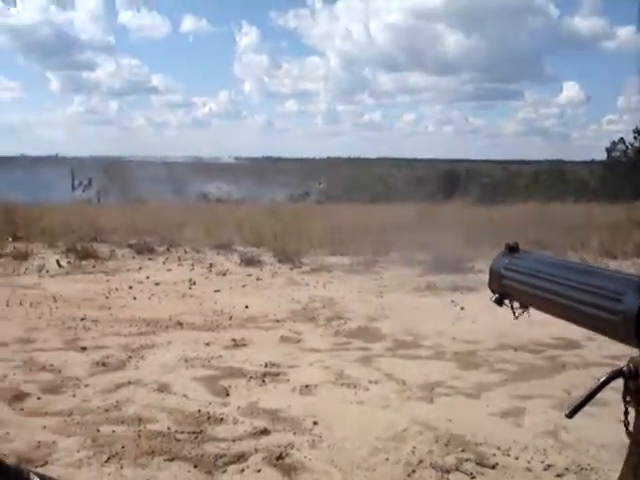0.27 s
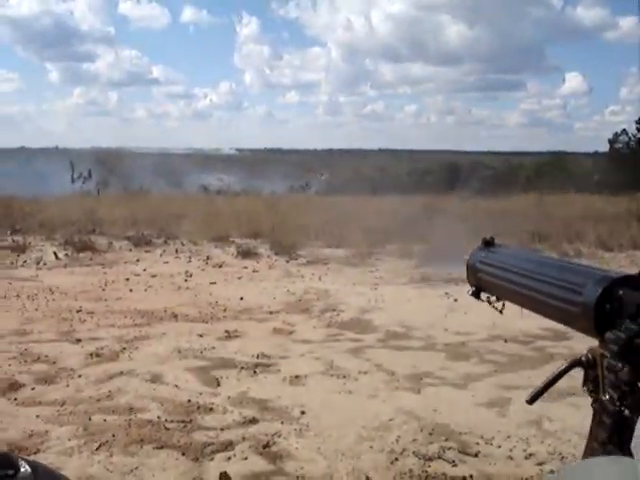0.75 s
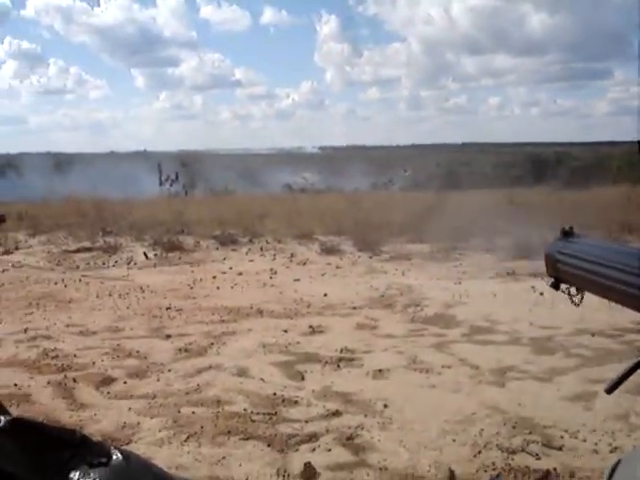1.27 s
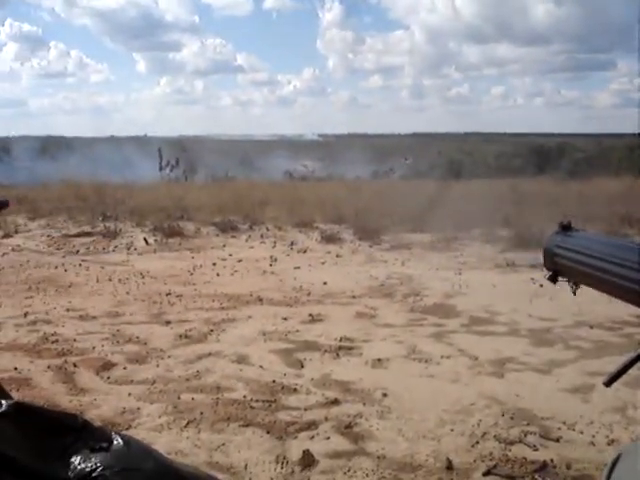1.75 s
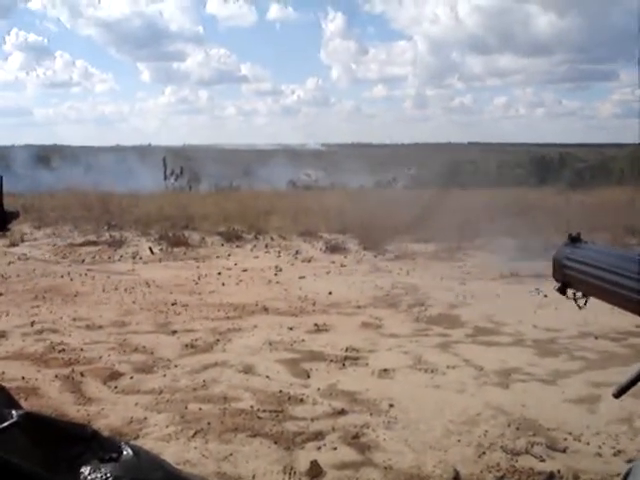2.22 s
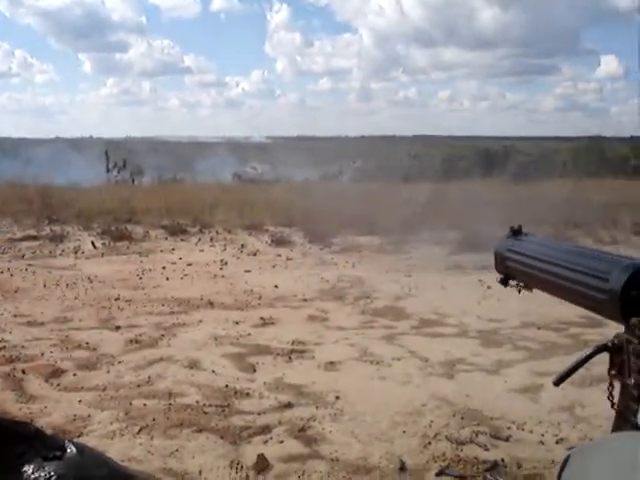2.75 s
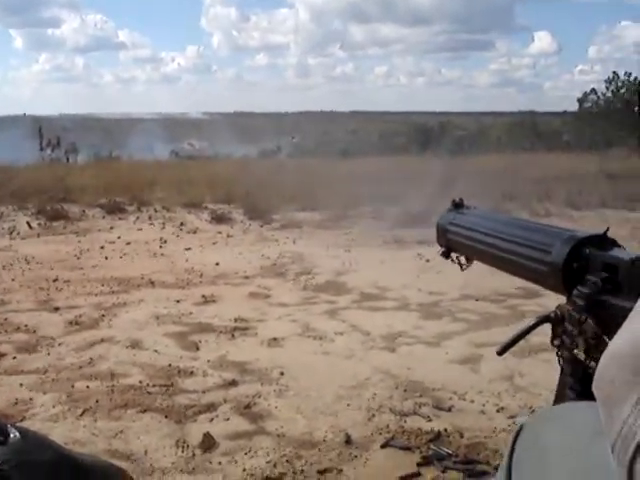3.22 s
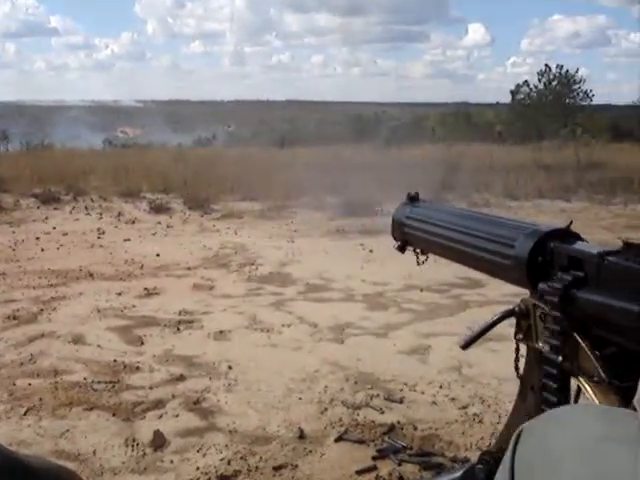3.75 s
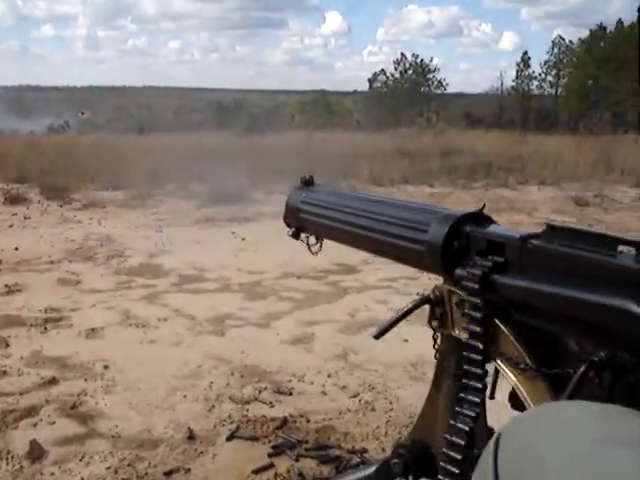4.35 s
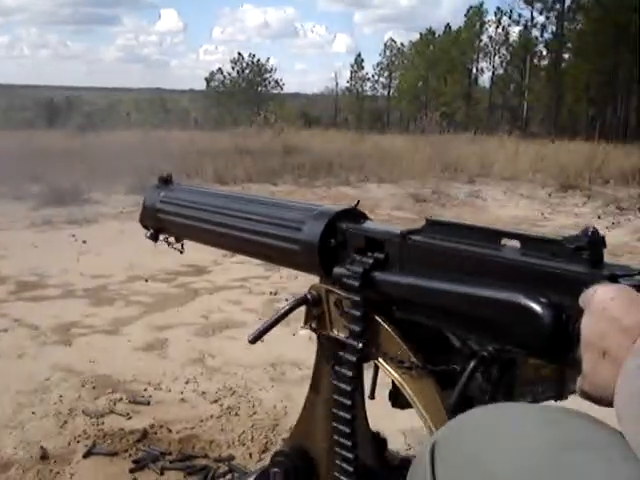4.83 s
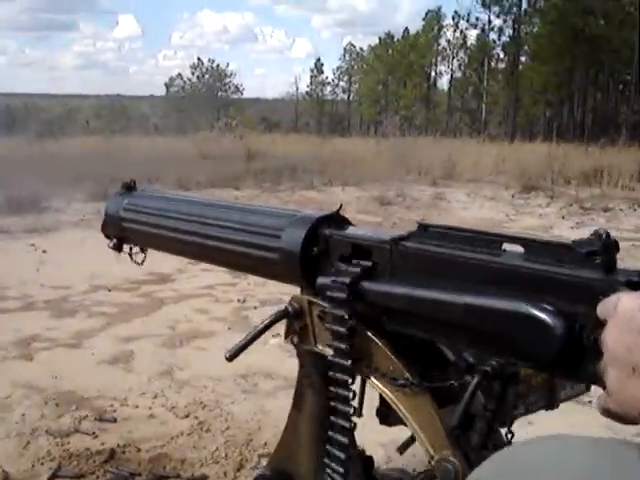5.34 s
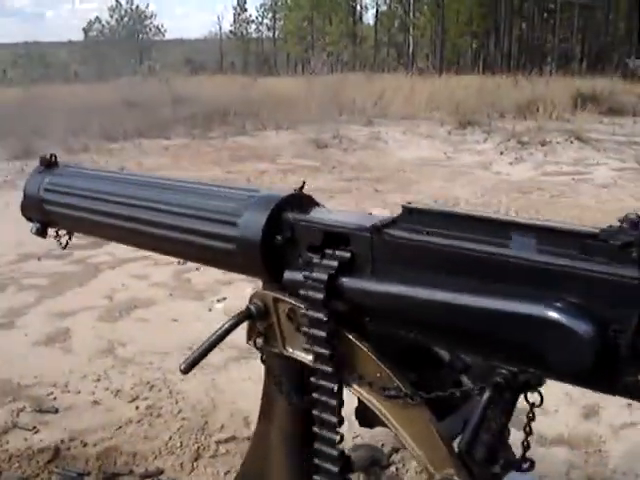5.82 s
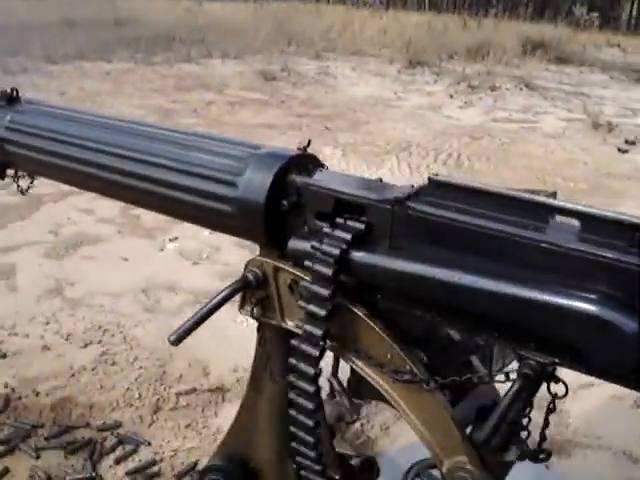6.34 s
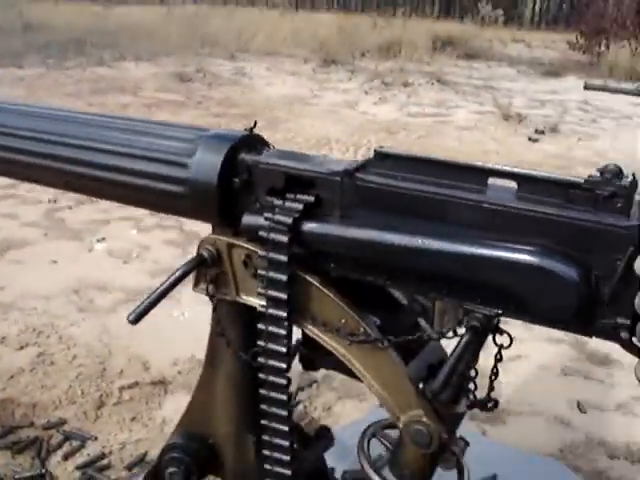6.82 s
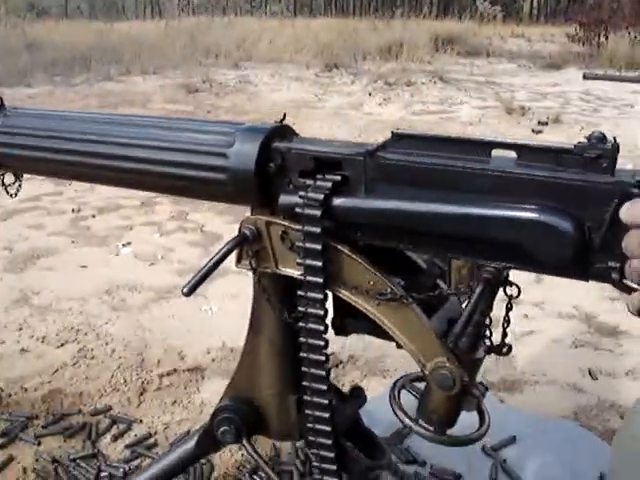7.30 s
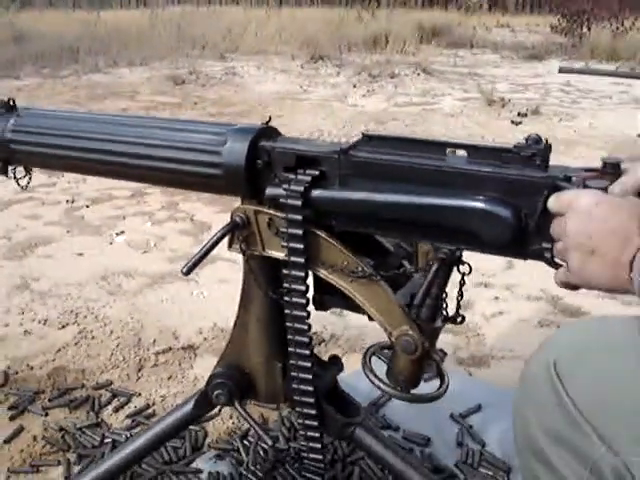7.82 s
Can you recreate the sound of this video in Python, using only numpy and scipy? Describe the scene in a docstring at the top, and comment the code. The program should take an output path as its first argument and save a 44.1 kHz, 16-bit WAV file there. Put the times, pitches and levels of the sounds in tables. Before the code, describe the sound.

A belt-fed machine gun fires one long unbroken string close to the microphone on an open sandy range, about seven shots a second, each a sharp crack, a woody boom and a steel clack with feed rattle. Another gun thumps nearby now and then. Firing stops after six and a half seconds; echo rolls off the trees, brass tinkles, and a faint distant rush swells.

```python
"""An open sandy range: a water-cooled, belt-fed machine gun fires one long string, about seven rounds a second.
Every round is a clack of the lock (steel noise), a crack (bright noise with a sharp front), a boom (dense
reflections shaped by resonances) and the clatter of the feed; the lock grows louder as the listener comes round
to the gun's open side. Another gun thumps further along the line as filtered clicks. Then the echo rolls away
as shaped noise, brass tinkles as decaying sines, and a far rush of noise rises."""
import sys
import numpy as np
from scipy import signal
from scipy.fft import rfft, irfft
from scipy.io import wavfile
from scipy.ndimage import uniform_filter1d

SR = 44100
rng = np.random.default_rng(int(sys.argv[2]) if len(sys.argv) > 2 else 0)


def log_audio(samples):
    """Write samples as a 16-bit WAV file to the path given in sys.argv[1]."""
    # one column per channel
    frames = np.atleast_2d(samples).T
    # limit to full scale, then quantise
    limited = np.clip(frames, -1, 1)
    pcm = np.round(limited * 32767).astype(np.int16)
    wavfile.write(sys.argv[1], SR, pcm)


N = 355886
SIZE = 8192   # samples in one short sound
AGE = np.arange(SIZE) / SR   # seconds since a short sound began
RUSH_S = 0.0236   # length of the blast's first rush

# moments at which the gun fires, a little uneven and quicker towards the end: [t/s]
ROUNDS = [0, .138, .2779, .4084, .5444, .6741, .8071, .9406, 1.078, 1.2162, 1.3571, 1.4995, 1.637, 1.774,
          1.912, 2.0487, 2.1859, 2.327, 2.4591, 2.6005, 2.7359, 2.8762, 3.0151, 3.1621, 3.3, 3.42, 3.5642,
          3.7062, 3.843, 3.9801, 4.1175, 4.2413, 4.3765, 4.5166, 4.653, 4.7895, 4.927, 5.0527, 5.1935,
          5.3193, 5.4515, 5.578, 5.7044, 5.8313, 5.9576, 6.0842, 6.2078, 6.34, 6.4663]
# colour of steel parts knocking and sliding: [f/Hz, relative level per Hz/dB]
STEEL = [(200, -9.5), (600, -3.5), (1100, 4), (2000, 0), (3500, -1), (5000, -5), (7000, -6.5),
         (10000, -17.5)]


def booms(thud_db=-46, thud_hz=62, sway=.008):
    """Nearly the same boom at every round, its colour moving between four tones; recoil thuds through the mount."""
    # resonances of the boom in each of its four tones: [f/Hz, width/Hz, level/dB]
    tone_0 = [(141.6, 41, -15), (182.6, 64, -9), (229.5, 18, -1.5), (262, 29, -0.5), (310.4, 42, -3.9),
              (327, 31.5, 0.2), (359, 51, -6.5), (414.1, 21.3, 1.5), (478, 24, 0.5), (548, 73, -1),
              (617, 15, -8), (654.6, 66, -0.7), (725, 74, -11.5), (748, 125, -4.9), (784, 110, -2),
              (863, 25, -3), (965, 78, -4.5), (1100.6, 58, -0.4), (1206, 50, -8.0), (1251, 35, -3),
              (1349, 128, -7), (1470, 154, -11), (1581, 17, -5.5), (1710, 27, -5.5), (1607, 69, -14),
              (1799, 170, -17.5), (1907, 140, -15.5), (2160, 2100, -20)]
    tone_1 = [(133, 17, -26), (177.6, 98, -12.5), (254, 60, -3.5), (326, 48, -14.5), (367.4, 19, -6),
              (387.7, 43, -4.5), (462, 50, -4.8), (581, 118, -5.5), (629.5, 14, 6), (674, 11.3, 3.5),
              (732, 53, 1.5), (776, 70, -5.5), (894, 69, 0.9), (1030, 94, -9.5), (1144, 49, -2.5),
              (1305, 280, -14.5), (1420, 630, -16), (1624, 26, 0.5), (2050, 280, -12), (2160, 67, -14)]
    tone_2 = [(176, 52, -7), (250, 20, -17.5), (299, 92, -2), (342, 20, -18), (379, 36, 3), (463, 16, 3),
              (558, 55, 4.7), (687, 150, -5), (750, 60, -4.5), (880, 110, -2.5), (1000, 210, -15.5),
              (1000, 180, -9), (1250, 380, -9), (1407, 20, -1.5), (1600, 26, -12.5), (1680, 78, -39),
              (1800, 140, -13.5), (2080, 410, -28.5)]
    tone_3 = [(178, 41, -8.5), (295.4, 93, 3), (405, 74, -4.5), (469, 22, 1), (563, 37, -3.5),
              (594, 170, -2), (716, 68, -2.5), (830, 66, -9), (801, 50, -4.5), (907, 31, 2),
              (930, 16, -21.5), (995, 26, -3), (1110, 93, -8.5), (1116, 110, -5.5), (1290, 78, -4),
              (1503, 43, -5), (1640, 182, -8), (2080, 920, -13.5)]
    # the boom's colour goes back and forth between four tones: [t/s, position among the tones, 0 to 3]
    colour_path = [(3.31, 0), (3.85, 2.37), (4.45, 1.37), (4.85, 2.43), (5.35, 2.5), (5.85, 3)]
    # colour of the roll over the ground: [f/Hz, relative level per Hz/dB]
    roll_spectrum = [(120, -14), (180, -13.5), (250, 4), (330, -7), (500, -7.5), (800, -11), (1100, -22),
                     (2000, -36.5), (2600, -36)]
    boom_db = -13.2   # every round has the same charge

    out = np.zeros(N)
    scatter = rng.standard_normal(SIZE) * fade(0.1025)
    ground = noise(roll_spectrum)
    tones = np.array([boom_response(scatter, ground, tone) for tone in (tone_0, tone_1, tone_2, tone_3)])
    thud = band(signal.unit_impulse(SIZE), thud_hz / 2, thud_hz * 2, order=1)
    thud = rms_one(thud, span=0.0051)
    for s in ROUNDS:
        # crossfade the two tones nearest to the position
        share = np.maximum(1 - np.abs(np.arange(len(tones)) - curve(colour_path, s)), 0)
        boom = rms_one(share @ tones) * tones.std()
        # gun and listener sway, so all paths stretch or shrink a little from round to round
        stretch = 1 + sway * rng.standard_normal()
        boom = np.interp(AGE * stretch, AGE, boom) * flicker(depth_db=.8, step_s=.006)
        add(out, s, from_db(boom_db) * boom + from_db(thud_db) * thud)
    return out


def boom_response(scatter, ground, resonances, rise_s=0.0088, roll_db=-7, roll_t60=0.79, count=6):
    """A rush of dense near reflections, then the ground roll; both take the colour of one tone."""
    roll_s = 0.092   # the roll breaks off at this age
    colour = resonance_curve(resonances)
    rush = np.minimum(AGE / rise_s + 0.12, 1) * from_db(-1500 * np.maximum(AGE - RUSH_S, 0))
    for _ in range(count):   # the reflections settle on the resonances and fill the rush evenly
        phase = np.angle(rfft(scatter))
        scatter = rms_one(irfft(colour * np.exp(1j * phase)))
        power = np.abs(uniform_filter1d(scatter ** 2, size=260))
        scatter = rush * scatter / np.sqrt(power + 0.056)
    ending = from_db(-600 * np.maximum(AGE - roll_s, 0))
    swell = np.minimum(AGE / RUSH_S, 1) ** 2
    decay = from_db(roll_db - 60 * np.maximum(AGE - RUSH_S, 0) / roll_t60)
    roll = ground * swell * decay * ending
    spectrum = rfft(rms_one(scatter, span=RUSH_S) + roll)
    # flatten the broad spectrum, then colour rush and roll together
    broad = np.sqrt(np.abs(uniform_filter1d(np.abs(spectrum) ** 2, size=9)) + 1e-9)
    whole = irfft(spectrum * uniform_filter1d(colour, size=3) / broad)
    whole = whole * np.minimum(AGE / 0.001 + .05, 1) * ending
    return rms_one(whole, span=RUSH_S)   # level of the rush is 1


def resonance_curve(resonances, blur_hz=22):
    """Gain at every frequency for overlapping resonances."""
    bins_hz = np.fft.rfftfreq(SIZE, 1 / SR)
    hz, width, db = np.transpose(resonances)[:, :, None]
    detuning = 2 * (bins_hz - hz) / np.hypot(width, blur_hz)
    peaks = from_db(db) / (1 + detuning ** 2)
    return np.sqrt(np.sum(peaks ** 2, 0))


def cracks(spread_db=.6, dull_db_per_s=40):
    """The bright edge of the blast: partly alike, partly fresh turbulence; its top flickers and dies first."""
    # colour of the crack: [f/Hz, relative level per Hz/dB]
    crack_spectrum = [(1200, -28.5), (1900, 3), (2300, 1), (3500, 2.5), (4500, -0.5), (6000, -6.5),
                      (8000, -10), (10000, -14.5)]
    crack_db = -15.4
    alike = .3   # share of the power that every round has in common
    out, same, life = np.zeros(N), noise(crack_spectrum), crack_life()
    lowpass = signal.butter(2, 5000, fs=SR, output="sos")
    for s in ROUNDS:
        crack = np.sqrt(alike) * same + np.sqrt(1 - alike) * noise(crack_spectrum)
        dull = signal.sosfiltfilt(lowpass, crack)
        top = (crack - dull) * from_db(-dull_db_per_s * AGE) * flicker(depth_db=2, step_s=.008)
        body = dull * flicker(depth_db=0.5, step_s=0.0016)
        gain = from_db(crack_db + spread_db * rng.standard_normal())
        add(out, s, gain * life * (body + top))
    return out


def crack_life(front_db=3, front_s=.0007, sag_db_per_s=380, cut_db_per_s=2200,
               scatter_db=-18.5, scatter_rise_s=.035, scatter_hold_s=.02, scatter_db_per_s=560):
    """A sharp front sags through the first rush and breaks off; weaker scatter from the ground follows."""
    front = front_db * np.exp(-AGE / front_s)
    direct_db = front - sag_db_per_s * AGE - cut_db_per_s * np.maximum(AGE - RUSH_S, 0)
    scatter = from_db(scatter_db) * envelope(AGE, scatter_rise_s, scatter_hold_s, scatter_db_per_s)
    return np.hypot(from_db(direct_db), scatter)


def action(spread_db=.9, slide_db=-10, slack_s=.003, rattle_t60=0.057):
    """The lock slides home and closes just before each round; belt and feed rattle after it."""
    # lock opens, belt is pulled, case drops: [mean delay after the round/s, mean level/dB]
    feed = [(.035, -25.5), (.045, -24.5), (.059, -43), (.088, -42)]
    # the action comes to rest: [t/s, level/dB]
    last_clacks = [(6.559, -44), (6.577, -31), (6.672, -37)]
    slide_s = 0.0075      # the lock slides this long before it closes
    lock_lead_s = .0083   # the lock closes this long before the round fires
    # the lock grows louder as the listener comes round to the open side
    approach_s, lock_levels_db = [3.3, 6.1], [-22.0, -16.5]

    out = np.zeros(N)
    slide = np.minimum(AGE / slide_s, 1) ** 2 * from_db(-3000 * np.maximum(AGE - slide_s, 0))
    rattle = np.minimum(AGE / .003, 1) * fade(rattle_t60)
    for s in ROUNDS:
        lock_db = np.interp(s, approach_s, lock_levels_db) + spread_db * rng.standard_normal()
        closes = s - lock_lead_s
        add(out, closes - slide_s, from_db(lock_db + slide_db) * noise(STEEL) * slide)
        add(out, closes, from_db(lock_db) * clack(ring_db=-1, t60=0.048))
        chances = rng.standard_normal((len(feed), 2))
        for (delay, feed_db), (slip, force) in zip(feed, chances):
            clatter = noise(STEEL) * rattle * flicker(depth_db=3.0, step_s=0.0037)
            add(out, s + delay + slack_s * slip, from_db(feed_db + 3.3 * force) * clatter)
    for s, db in last_clacks:
        add(out, s, from_db(db) * clack(ring_db=-1, t60=0.21))
    return out


def clack(ring_db, t60):
    """Steel meets steel: a brief contact, and a dense ring that differs from blow to blow."""
    contact, attack = fade(.02), np.minimum(AGE / .0003, 1)
    return noise(STEEL) * (contact + from_db(ring_db) * fade(t60)) * attack


def other_guns(low_hz=170, high_hz=400, edge_db=-14):
    """Heard from afar, a shot is one rounded pressure swing with a little edge, or a dull pop."""
    # the gun further along the line: [t/s, peak level of the swing/dB]
    other_gun = [(0.11, -7.5), (1.134, -8.5), (1.323, -7), (1.4199, -8.5), (3.2592, -6.5), (3.351, -10.5),
                 (3.442, -21), (3.5354, -8), (3.622, -8.5)]
    # single far shots: [t/s, level before a common 2 dB lift/dB]
    far_shots = [(6.822, -29), (6.96, -41), (7.004, -44)]
    out, click = np.zeros(N), signal.unit_impulse(SIZE)
    swing = band(band(click, low_hz, high_hz), 80, 4000)
    edge = band(click, 390, 1000)
    shot = swing / np.abs(swing).max() + from_db(edge_db) * edge / np.abs(edge).max()
    for s, db in other_gun:
        add(out, s, from_db(db) * shot)
    for s, db in far_shots:
        pop = band(rng.standard_normal(SIZE) * fade(0.059), 310, 950, order=3)
        add(out, s, from_db(db + 2) * rms_one(pop, span=0.0092))
    return out


def cases(tick_db=0, spread=.025):
    """Brass lands on the heap: a tick, and a ring at a pitch of its own for each case."""
    # spent cases land: [t/s, level/dB]
    landings = [(6.819, -41), (6.85, -46), (6.9184, -42), (7.033, -42.5), (7.098, -38), (7.209, -39),
                (7.2157, -32), (7.258, -45), (7.2887, -47), (7.316, -47)]
    # modes of a brass case: [mean f/Hz, mean level/dB, t60/s]
    brass = [(4500, -8, 0.024), (5800, 0, .012), (6140, -12, .012), (6950, -10, .03), (8200, -11, 0.091),
             (9040, -19, 0.15)]
    out = np.zeros(N)
    for s, db in landings:
        pitch = 1 + spread * rng.uniform(-1.3, 1)
        ring = np.zeros(SIZE)
        for hz, level, t60 in brass:
            gain = from_db(level + rng.normal(0, 1.3))
            ring += gain * np.sin(2 * np.pi * hz * pitch * AGE) * fade(t60)
        tick = rms_one(band(rng.standard_normal(SIZE), 2700, 7600)) * fade(0.039)
        add(out, s, from_db(db) * (ring + from_db(tick_db) * tick))
    return out


def tree_echo(field_db=-38, forest_db=-41, answer_s=.22, answer_db=-37):
    """Each round rolls briefly off the open field and long off the forest, whose edge gives one dull answer."""
    # colour of the echo: [f/Hz, relative level per Hz/dB]
    echo_spectrum = [(110, -18.5), (170, 7), (260, 9), (500, 8), (700, 3.5), (1000, -7), (1500, -5.5),
                     (2400, -5.5), (4000, -24), (10000, -105)]
    out, age = np.zeros(N), np.arange(2 * SR) / SR
    field = from_db(field_db) * envelope(age, attack_s=.05, hold_s=.005, fall_db_per_s=150)
    forest = from_db(forest_db) * envelope(age - answer_s, attack_s=.04, hold_s=.14, fall_db_per_s=33)
    roll = noise(echo_spectrum, size=len(age)) * np.hypot(field, forest)
    answer = rms_one(band(rng.standard_normal(SIZE), 220, 700))
    answer = answer * np.minimum(AGE / 0.011, 1) * fade(0.23)
    for s in ROUNDS:
        add(out, s, roll)
        add(out, s + answer_s, from_db(answer_db) * answer)
    return out


def surroundings(air_db=-46.5, rush_start_s=7.45, rush_db=-42.7):
    """Open air as steady noise, a far rush that swells late, and a few soft bumps of low noise."""
    # colours of the open air and of the far rush: [f/Hz, relative level per Hz/dB]
    air_spectrum = [(20, -13.5), (40, 1), (60, -3), (90, -4), (250, -3), (400, -4), (800, -5.5), (1500, -1),
                    (2400, -4), (3400, -11.5), (5000, -20), (10000, -35.5)]
    rush_spectrum = [(100, -15), (300, -17), (500, 0), (700, 5.5), (1200, 3), (1600, -3), (2200, -8),
                     (3500, -17), (6000, -23.5), (10000, -30)]
    # soft bumps: [t/s, level before a common 3 dB lift and the fade/dB]
    bumps = [(7.473, -46), (7.573, -41), (7.624, -37), (7.646, -46), (7.69, -46), (7.844, -45)]
    out = from_db(air_db) * noise(air_spectrum, size=N)
    rush_age = np.arange(N) / SR - rush_start_s
    swell = envelope(rush_age, attack_s=.03, hold_s=.04, fall_db_per_s=5)
    out += from_db(rush_db) * swell * noise(rush_spectrum, size=N)
    for s, db in bumps:
        bump = rms_one(band(rng.standard_normal(SIZE), 127, 450))
        add(out, s, from_db(db + 3) * bump * fade(0.25) * np.minimum(AGE / 0.0042, 1))
    return out


def from_db(db):
    """Decibels to gain."""
    return 10 ** (np.asarray(db) / 20)


def rms_one(x, span=None):
    """Scale to rms 1 over the first span seconds, or over all."""
    part = x[:span and int(span * SR)]
    return x / np.sqrt(np.mean(part ** 2) + 1e-20)


def curve(rows, t):
    """Join rows [t/s, value] by straight lines."""
    return np.interp(t, *np.transpose(rows))


def noise(spectrum, size=SIZE):
    """Noise of rms 1 with the given spectrum, falling away below its first point."""
    hz, db = np.transpose(spectrum)
    f = np.fft.rfftfreq(size, 1 / SR) + 1e-3   # keeps the logarithm finite at 0 Hz
    gain = from_db(np.interp(np.log(f), np.log(hz), db)) * np.minimum(f / hz[0], 1) ** 2
    return rms_one(irfft(rfft(rng.standard_normal(size)) * gain, size))


def band(x, low_hz, high_hz, order=2):
    """Causal band-pass."""
    return signal.sosfilt(signal.butter(order, [low_hz, high_hz], "band", fs=SR, output="sos"), x)


def fade(t60):
    """Exponential decay by 60 dB in t60 seconds."""
    return from_db(-60 * AGE / t60)


def envelope(age, attack_s, hold_s, fall_db_per_s):
    """Rise to 1, hold, then die away."""
    return np.clip(age / attack_s, 0, 1) * from_db(-fall_db_per_s * np.maximum(age - attack_s - hold_s, 0))


def flicker(depth_db, step_s):
    """A gain that wanders at random, with a new value every step_s seconds."""
    values = rng.standard_normal(SIZE // 16)
    return from_db(depth_db * np.interp(AGE / step_s, np.arange(len(values)), values))


def add(out, s, sound):
    """Mix a sound in at time s; one that would start outside the scene is left out."""
    at = round(s * SR)
    if 0 <= at < N:
        out[at:at + len(sound)] += sound[:N - at]


def scene():
    """All sources at one microphone."""
    gun = booms() + cracks() + action()
    return (gun + other_guns() + cases() + tree_echo() + surroundings())[None]


def record(dry):
    """The microphone rounds the highest peaks towards a ceiling; a steep low-pass cuts the treble."""
    ceiling, cutoff_hz = .54, 10050
    rounded = dry / (1 + (dry / ceiling) ** 4) ** (1 / 4)
    return signal.sosfilt(signal.ellip(10, .1, 62, cutoff_hz, fs=SR, output="sos"), rounded)


dry = scene()
out = record(dry)
log_audio(out)
```